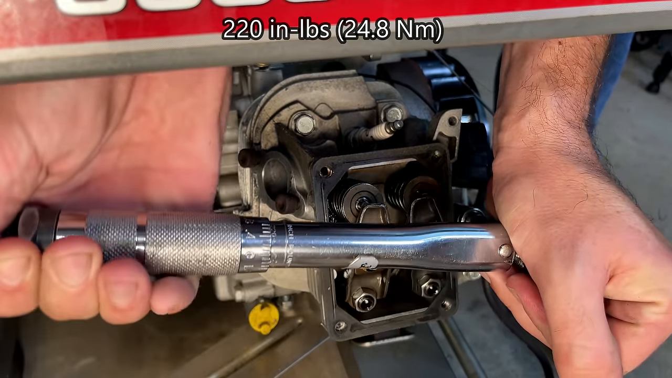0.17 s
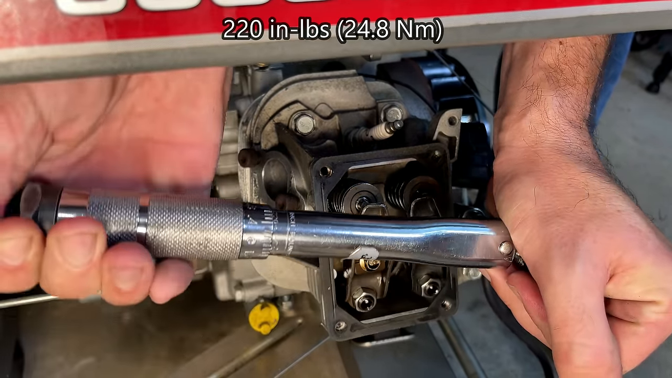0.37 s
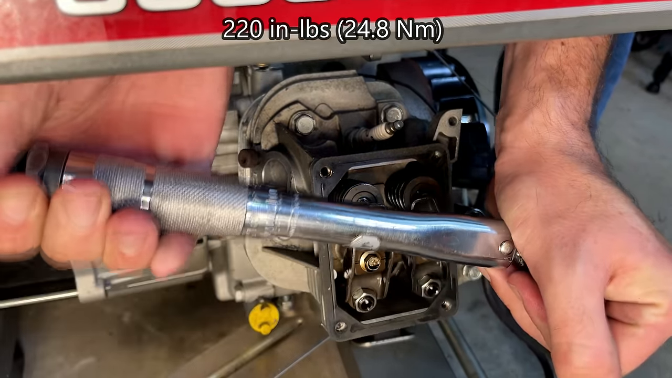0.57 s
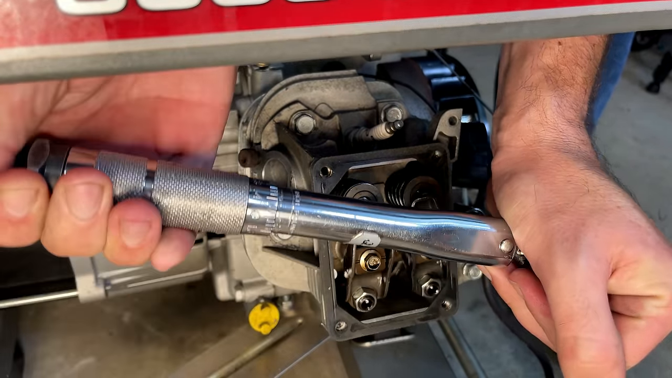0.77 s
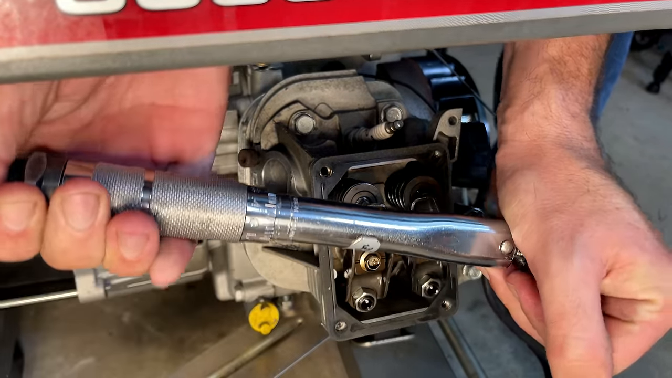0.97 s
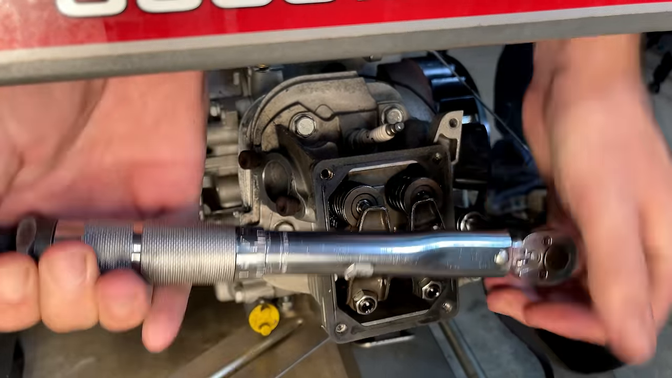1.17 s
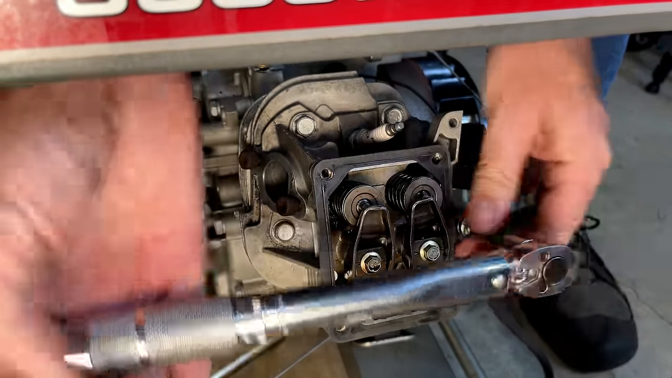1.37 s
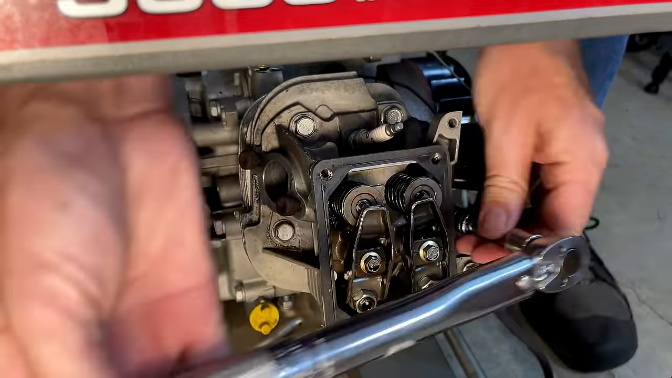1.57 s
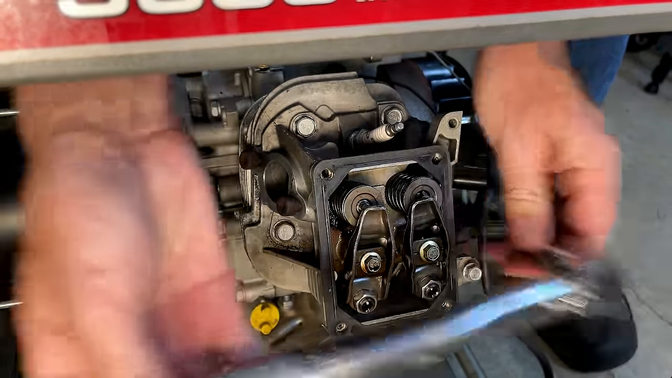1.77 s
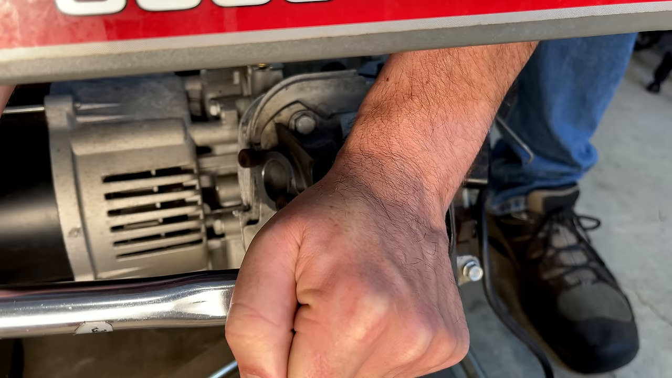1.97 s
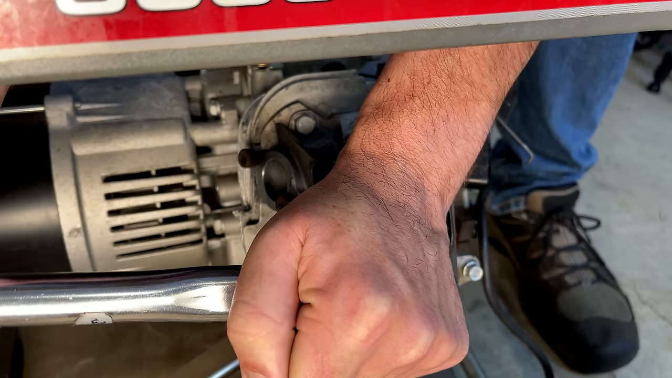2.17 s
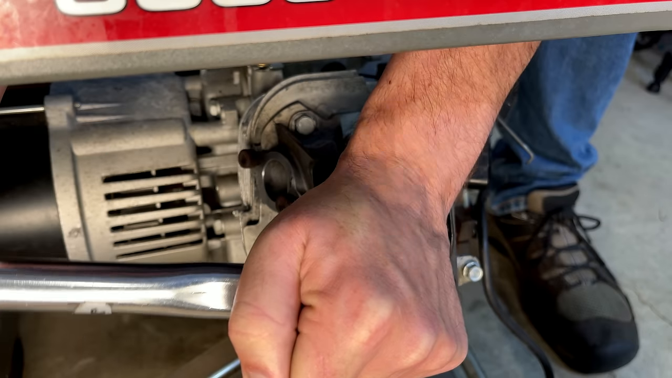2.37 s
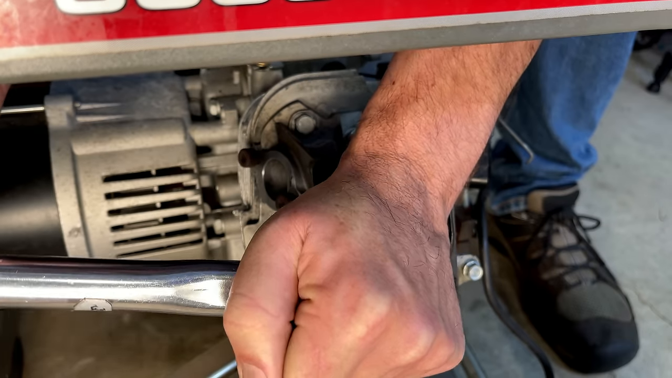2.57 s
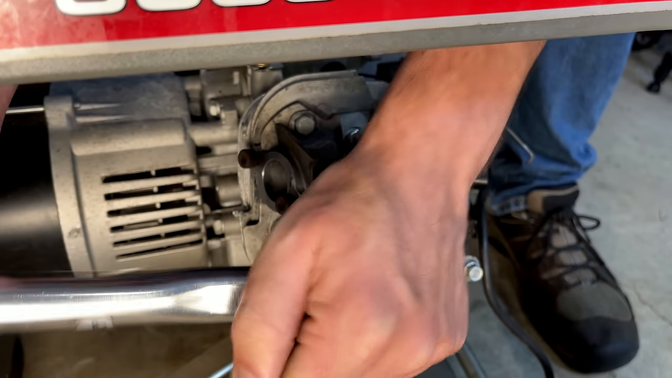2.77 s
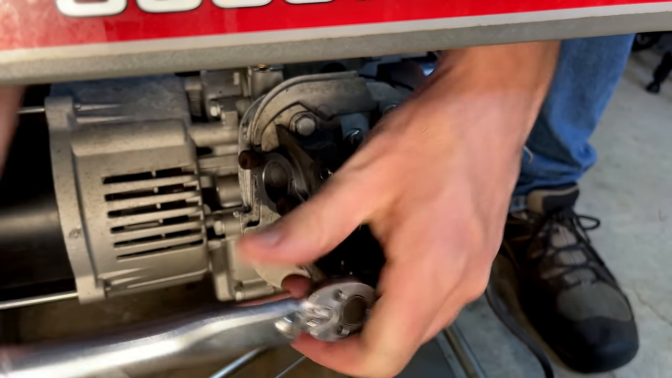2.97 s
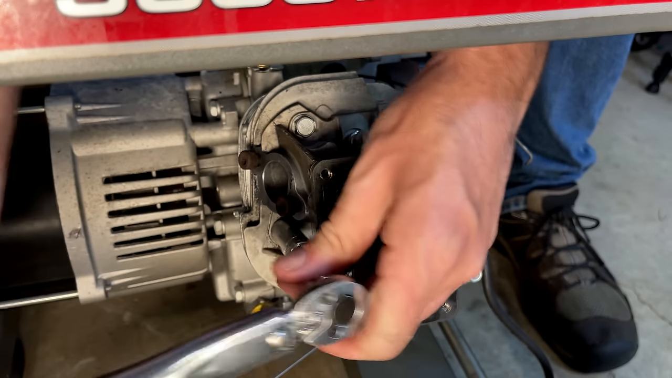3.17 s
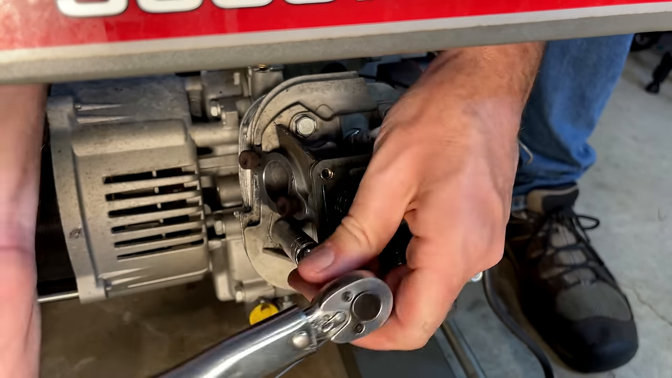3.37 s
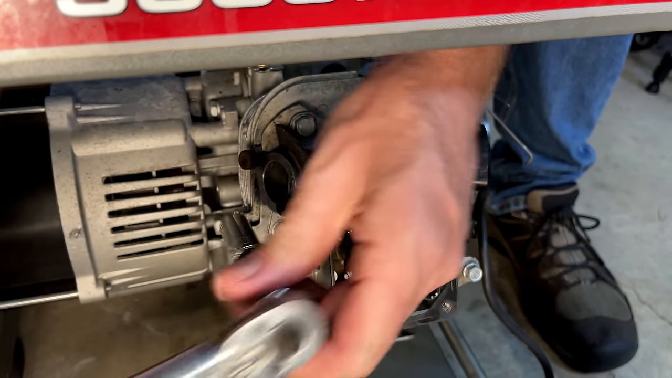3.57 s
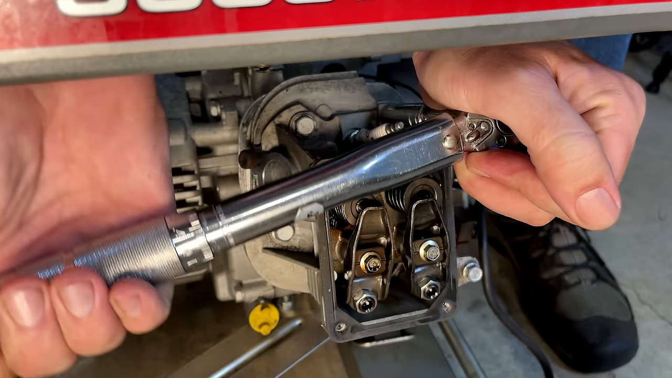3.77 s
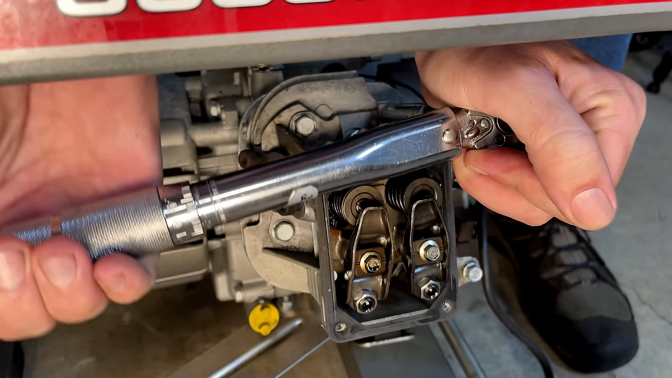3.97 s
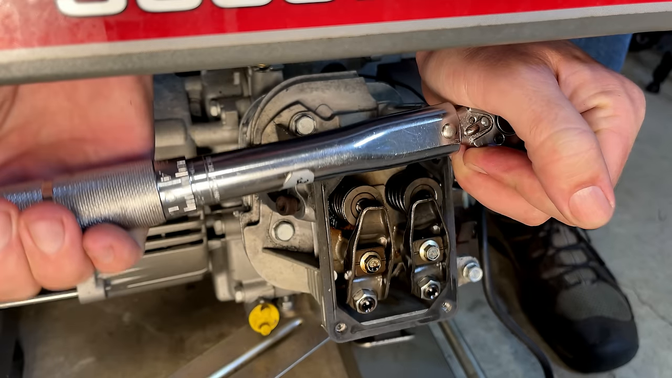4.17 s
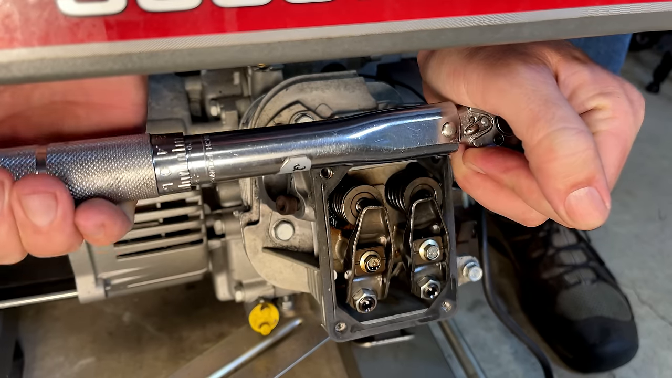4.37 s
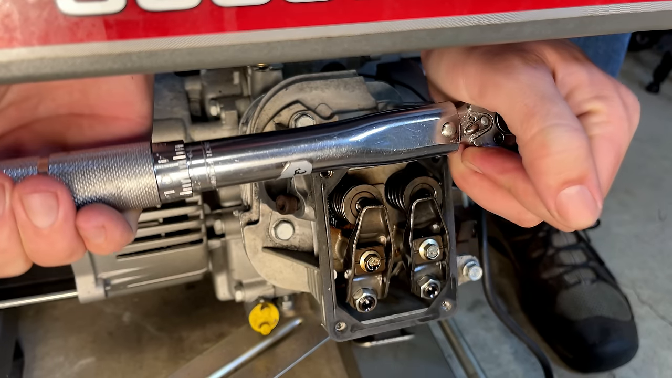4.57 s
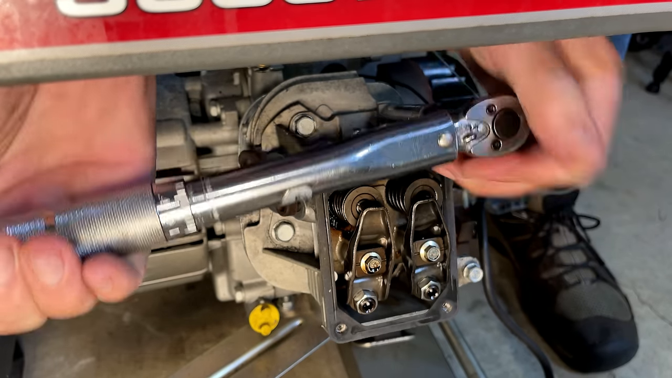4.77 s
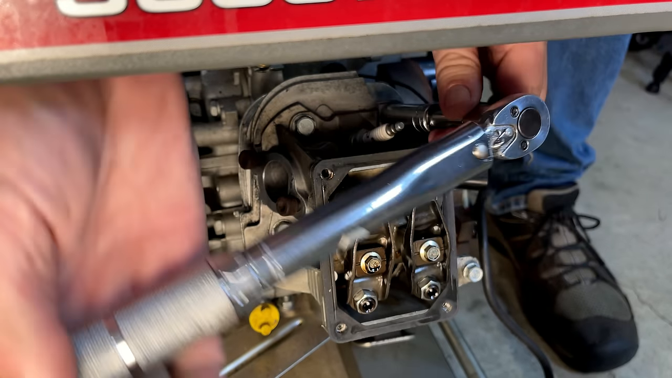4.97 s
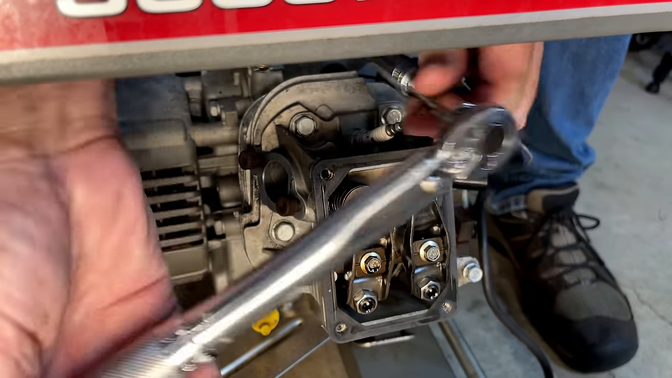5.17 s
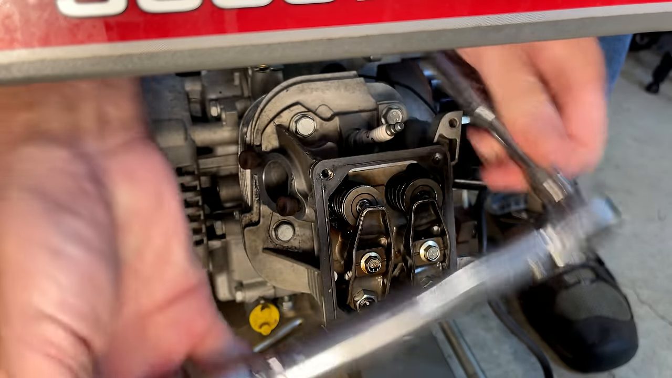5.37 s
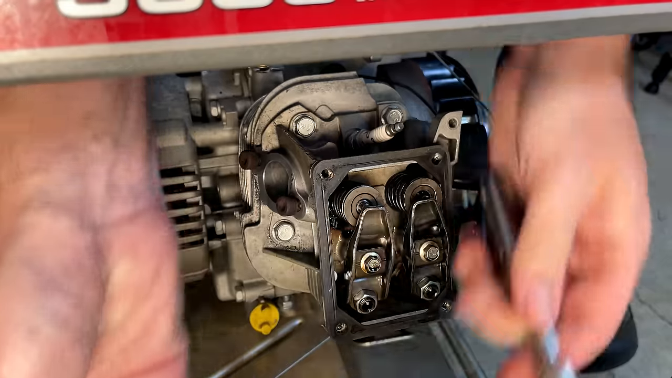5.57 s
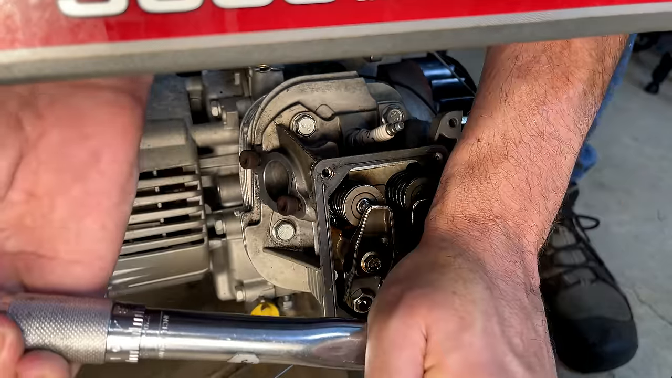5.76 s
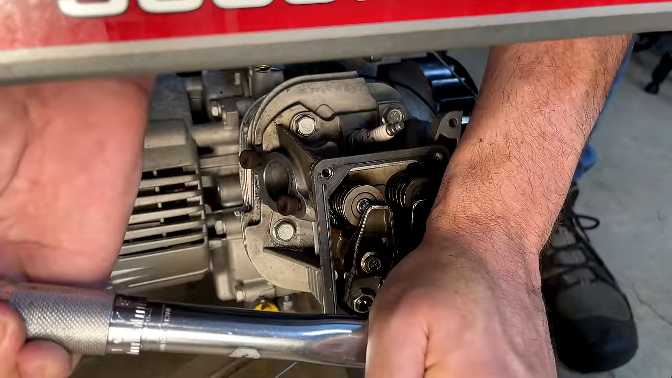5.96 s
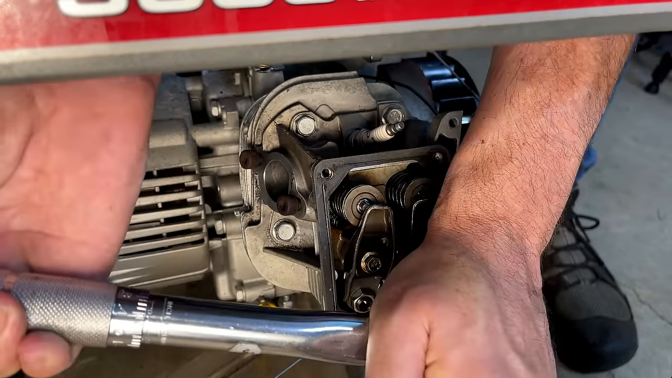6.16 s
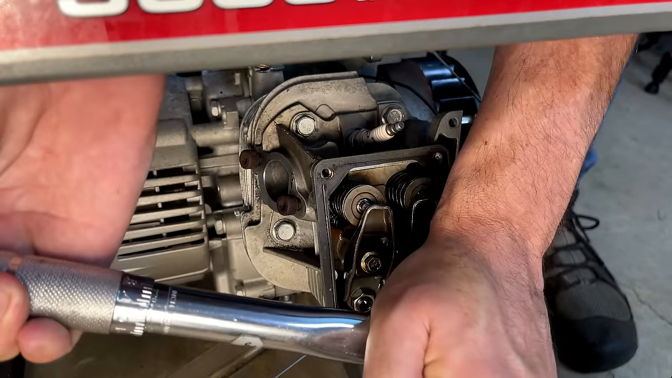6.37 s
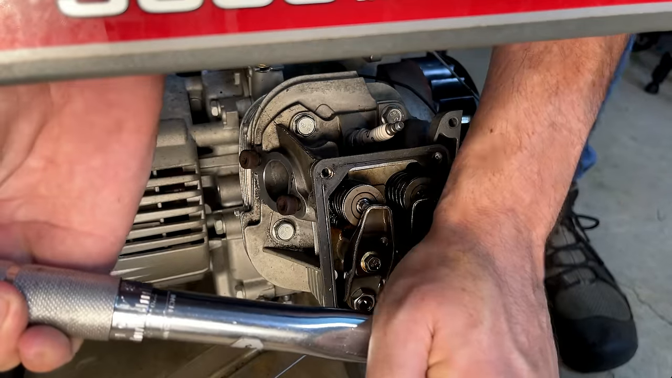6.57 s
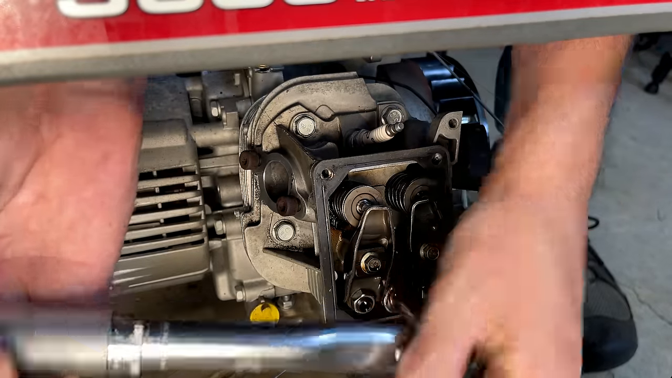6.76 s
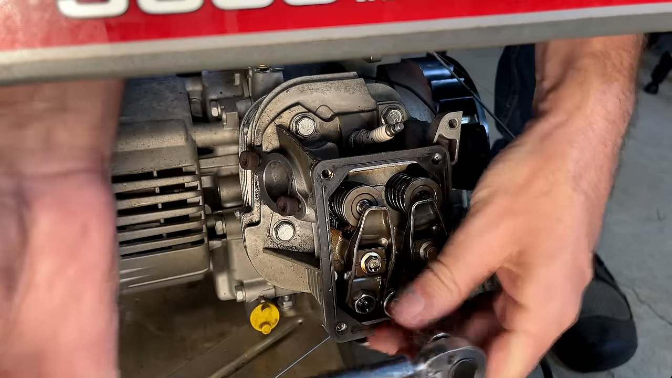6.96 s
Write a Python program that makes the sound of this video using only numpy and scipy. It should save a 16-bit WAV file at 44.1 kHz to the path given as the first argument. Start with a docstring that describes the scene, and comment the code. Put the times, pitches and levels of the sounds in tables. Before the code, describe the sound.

Four pairs of sharp, ringing steel clicks from a torque wrench, with soft ticks and socket clinks between them over a low workshop hum.

```python
"""A low motor hum and dull room air fill a hard-walled workshop. Close to a mono microphone, a click-type
torque wrench breaks over on a small engine's rocker bolt: a sharp steel snap that rings the engine and
the room. Half a second later it snaps back as the hand eases off. The ratchet pawl ticks and the socket
knocks off the nut. Three more bolts follow, about two seconds apart, each with its snap and return;
ticks and knocks lead to the third, ticks alone to the fourth."""
import sys
import numpy as np
from scipy import signal
from scipy.fft import rfft, irfft
from scipy.io import wavfile
from scipy.ndimage import uniform_filter1d

SR = 44100
rng = np.random.default_rng(int(sys.argv[2]) if len(sys.argv) > 2 else 0)


def persist_wave(psi):
    """Save psi, clipped to +-1, as 16-bit WAV."""
    counts = np.round(np.clip(psi, -1, 1) * 32767).astype(np.int16)
    wavfile.write(sys.argv[1], SR, np.atleast_2d(counts).T)


N = 310023
T = np.arange(SR) / SR  # one second, the life of a click
HZ = np.arange(SR // 2 + 1)  # its frequency axis


def undb(db):
    """Decibels to gain."""
    return 10 ** (np.asarray(db) / 20)


def unit(x):
    """Scale to rms 1."""
    return x / np.sqrt(np.mean(x ** 2))


def along(points, hz):
    """Read a curve of (f/Hz, value) points on a log-frequency axis."""
    f, value = np.transpose(points)
    return np.interp(np.log(hz + 1), np.log(f), value)


def wander(rate_hz):
    """Slow random modulation, rms 1."""
    hold = int(SR / rate_hz)
    steps = np.repeat(rng.standard_normal(N // hold + 1), hold)
    return unit(uniform_filter1d(uniform_filter1d(steps, hold), hold)[:N])


def room_air(level_db=-64):
    """The bed: a dull, steady rush of air."""
    # spectrum of the air: f/Hz, relative level/dB
    colour = [(15, -57.5), (25, -31.5), (41, -12), (64, -22.5), (82, -12), (108, -3.5), (141, -9.5),
              (200, -5), (229, -13), (363, -13), (451, -15), (659, -17), (1330, -23.5), (2000, -32.5),
              (16000, -46)]
    hz = np.arange(N // 2 + 1) * SR / N
    rush = irfft(rfft(rng.standard_normal(N)) * undb(along(colour, hz)), N)
    return undb(level_db) * unit(rush)


def motor_hum(waver_db=1.25, drift_rad=.55):
    """A distant motor hums; its upper partials waver more than the lowest."""
    # motor partials: f/Hz, rms level/dB
    partials = [(59.2, -65), (118.4, -69.5), (194.5, -77), (367, -77), (640.6, -83.5), (6589, -99.5)]
    t = np.arange(N) / SR
    hum = np.zeros(N)
    for k, (hz, db) in enumerate(partials):
        gain = np.sqrt(2) * undb(db + waver_db * min(k, 2) * wander(3))
        drift = drift_rad * (k + 0.13) * wander(7.1)
        hum += gain * np.sin(2 * np.pi * hz * t + drift)
    return hum


def chatter(length_s, rise=0.21, settle_s=0.0022):
    """Steel faces slip and rebound for a few ms, ever harder, then settle: a burst of unit energy."""
    attack = np.minimum((T + 1 / SR) / length_s, 1) ** rise
    envelope = attack * np.exp(-np.maximum(T - .8 * length_s, 0) / settle_s)
    burst = rng.standard_normal(SR) * envelope
    for _ in range(4):  # flatten the spectrum while keeping the burst short
        burst = irfft(np.exp(1j * np.angle(rfft(burst)))) * envelope ** .25
    return burst / np.linalg.norm(burst)


def body(x, db):
    """Colour x through a resonant body: a minimum-phase filter whose gain is db over HZ."""
    cepstrum = irfft(np.log(undb(db)))
    cepstrum[1:SR // 2] *= 2
    cepstrum[SR // 2 + 1:] = 0
    return irfft(rfft(x) * np.exp(rfft(cepstrum)))


def driven(modes, spot_hz, lift_db, width_hz=220):
    """Each bolt or nut is struck at its own spot and drives the modes near one pitch hardest."""
    return [(hz, db + lift_db * np.exp(-((hz - spot_hz) / width_hz) ** 4), t60) for hz, db, t60 in modes]


def strike(blow, colour, modes, modes_db):
    """A burst of chatter through a steel part: a short coloured crack, then its modes ring on."""
    tones = sum(undb(db) / np.sqrt(t60 * SR) * np.sin(2 * np.pi * hz * T) * 1000 ** (-T / t60)
                for hz, db, t60 in modes)
    crack = body(blow, along(colour, HZ))
    return crack + undb(modes_db) * signal.fftconvolve(blow, tones)[:SR]


def seating(tilt_db, grip_hz, grip_db, ripple_db=1.5, ripple_step_hz=261):
    """EQ of a held part: contact hardness tilts it; the grip frees one resonance, damps the rest."""
    tilt = tilt_db * np.log2(np.maximum(HZ, 500) / 5000)
    half_width_hz = 0.025 * grip_hz + 30
    freed = grip_db / (1 + ((HZ - grip_hz) / half_width_hz) ** 2)
    ripple = rng.standard_normal(128)  # the fingers damp unevenly, differently on every blow
    return tilt + freed + ripple_db * np.interp(HZ / ripple_step_hz, np.arange(len(ripple)), ripple)


def workshop(x, wet_db, build_s=0.0017, thicken_s=0.055, sparse=0.27):
    """Direct sound, three near echoes and a tail that thickens with time and loses its treble first."""
    # reverb bands: f/Hz, t60/s, relative level/dB
    bands = [(200, 1, 0), (700, 0.73, 2.5), (1990, 0.62, 1), (3830, 0.65, 1.25), (6800, 0.61, -3),
             (9380, 0.54, -2.5), (12900, 0.46, -1.5), (16200, 0.31, 0.5)]
    # slaps off bench, floor and wall: delay/s, level/dB
    echoes = [(.0058, -7.5), (0.0172, -38.5), (0.0374, -18.5)]
    density = np.clip(sparse * (.1 + (T / thicken_s) ** 2), .001, 1)
    wash = rfft(rng.standard_normal(SR) * (rng.random(SR) < density) / np.sqrt(density))
    centres = np.array(bands)[:, 0]
    tail = sum(undb(db) * irfft(wash * np.interp(HZ, centres, share)) * 1000 ** (-T / t60)
               for share, (_, t60, db) in zip(np.eye(len(bands)), bands))
    tail *= 1 - np.exp(-T / build_s)
    response = tail * undb(wet_db) / np.linalg.norm(tail)
    response[0] += 1  # direct sound
    for delay, db in echoes:
        response[int(delay * SR)] += undb(db)
    return signal.fftconvolve(x, response)[:SR]


def frame_shudder(band_hz=(105, 200), swell_s=0.2):
    """The engine's frame shudders as the load jumps; the lows come late and linger."""
    bandpass = signal.butter(2, band_hz, "band", fs=SR, output="sos")
    rumble = signal.sosfilt(bandpass, rng.standard_normal(SR))
    return unit(rumble) * T / swell_s * np.exp(1 - T / swell_s)


def place(out, s, x):
    """Mix x in at time s; its tail stops dead if it reaches a cut."""
    # cuts ahead of the second and third bolts: t/s
    cuts = [2.04, 3.74]
    start = int(s * SR)
    stop = min([N, start + len(x)] + [int(cut * SR) for cut in cuts if cut > s])
    out[start:stop] += x[:stop - start]


def wrench(snaps, colour, gain_db, ring_db, bolt_db, shudder_db, wet_db):
    """Each snap cracks in the wrench's steel and runs down the socket into the engine, which rings."""
    # ringing metal of the engine, and the room's own low resonances at 470, 735 and 927 Hz: f/Hz, relative
    # level/dB, t60/s
    engine_modes = [(470, -10, .12), (735, -10, .08), (927, -16, .25), (1279, -19, .25), (1740, -10, .15),
                    (2794, -8, .25), (2982, -7, .25), (3127, -5, .2), (3240, -9, .18), (3348, -8, .2),
                    (3752, -1, .2), (3805, -7, .15), (4085, -6, .45), (4269, -1.5, .27), (4375, -5, .2),
                    (4985, -7, .35), (5186, -9, .42), (5303, -10, .42), (6315, -9, .35), (6521, -9, .4),
                    (8100, -13, .4), (8680, -7, .3), (8830, -8, .3), (9570, -5, .22), (10110, -5, .25),
                    (11300, -11, .25), (11930, -11, .25), (12940, -12, .25), (13697, -13, .25)]
    out = np.zeros(N)
    for s, db, length_s, tilt_db, bolt_hz, grip_hz, grip_db in snaps:
        modes = driven(engine_modes, bolt_hz, bolt_db)
        hit = strike(chatter(length_s), colour, modes, ring_db)
        snap = body(hit, seating(tilt_db, grip_hz, grip_db))
        place(out, s, undb(gain_db + db) * workshop(snap, wet_db) + undb(shudder_db) * frame_shudder())
    return out


def break_over():
    """At full torque the sprung block tips over and the head's tang slaps the tube."""
    # one snap per bolt: t/s, relative level/dB, chatter/s, tilt/(dB per octave),
    # bolt's pitch f/Hz, resonance freed by the grip f/Hz, its lift/dB
    snaps = [(.6535, 0, 0.0067, -0.3, 8100, 6390, 12), (2.4490, 1, 0.0087, 0, 5210, 4290, 5),
             (4.3470, 1.5, 0.006, 0.5, 5130, 6470, 7.5), (6.2935, 0, 0.0071, 0, 3310, 1970, 5.5)]
    # tone of the steel tube and head at break-over: f/Hz, level/dB
    colour = [(150, -7), (450, -24), (750, -6), (1050, -14), (1900, -4.5), (2450, -5), (3150, 2.5),
              (4700, 0), (5800, 1), (7500, 3.5), (9700, 4), (11000, 0), (14000, -6), (15800, -13.5)]
    return wrench(snaps, colour, gain_db=-2, ring_db=-9, bolt_db=11, shudder_db=-67.5, wet_db=1.5)


def snap_back():
    """The hand eases off and the sprung head snaps home."""
    # one return per bolt: t/s, relative level/dB, chatter/s, tilt/(dB per octave),
    # bolt's pitch f/Hz, resonance freed by the grip f/Hz, its lift/dB
    snaps = [(1.1620, -.3, 0.0041, 0, 8300, 8800, 4.9), (2.8633, 0, 0.0054, -0.47, 3830, 3106, 5.8),
             (4.7730, 0.17, 0.0059, -0.2, 5000, 4190, 2.4), (6.6937, -0.23, 0.0051, -0.27, 5560, 2650, 7.6)]
    # tone of the steel tube and head on return: f/Hz, level/dB
    colour = [(150, -35), (500, -9), (1300, -9.5), (1750, 1), (2300, -4), (2900, 1), (4200, 5), (5200, 2),
              (7500, 1.5), (8600, 4.5), (9900, 5), (10750, -3.5), (12600, 1), (15800, -24)]
    return wrench(snaps, colour, gain_db=-1.86, ring_db=-5, bolt_db=6, shudder_db=-69, wet_db=2)


def ratchet(gain_db=-3):
    """The pawl drops over single teeth as the wrench is carried across."""
    # pawl drops: t/s, relative level/dB
    ticks = [(1.53, -26), (1.832, -40), (3.367, -34.5), (3.506, -37), (5.214, -35.5), (5.279, -35),
             (5.665, -36.5), (5.701, -36.5), (5.758, -43)]
    # tone of the pawl: f/Hz, level/dB
    colour = [(500, -25), (2000, 0), (4000, -4.5), (7200, -0.5), (9800, -6.5), (12000, -9), (16000, -27)]
    out = np.zeros(N)
    for s, db in ticks:
        tick = body(chatter(length_s=0.004, rise=0.17, settle_s=.003), along(colour, HZ))
        place(out, s, undb(gain_db + db) * workshop(tick, wet_db=2))
    return out


def socket(gain_db=-3):
    """The loose socket rattles on a nut and clinks; the hand shields it, so the room carries most."""
    # socket meeting or leaving a nut: t/s, relative level/dB, tilt/(dB per octave),
    # nut's pitch f/Hz, resonance freed by the grip f/Hz, its lift/dB
    knocks = [(1.8886, -23, -0.1, 2100, 2020, 2), (3.4032, -25, -3.5, 1520, 11000, 19),
              (3.431, -27, 3.5, 5400, 4100, 13), (3.575, -29, -1, 5600, 5140, 16),
              (3.5949, -17, 2, 7540, 3810, 16)]
    # tone of the socket's crack: f/Hz, level/dB
    colour = [(200, -8), (700, -7.5), (1400, 1), (2150, 1.5), (2640, 7.5), (3200, -3.5), (4500, -4.5),
              (5600, -0.5), (6800, -7), (9500, -8), (12000, -12), (15500, -31)]
    # ringing steel of the socket: f/Hz, relative level/dB, t60/s
    socket_modes = [(1586, -7, 0.08), (2020, -5, 0.14), (2130, 1.5, .2), (2660, -14.5, 0.096),
                    (3180, -1, 0.068), (3590, -20, .12), (3940, -11, 0.13), (5460, -3, .18),
                    (5340, -15, .15), (7570, -12, 0.17)]
    out = np.zeros(N)
    for s, db, tilt_db, nut_hz, grip_hz, grip_db in knocks:
        rattle = chatter(length_s=0.0098, rise=0.38, settle_s=0.0038)
        modes = driven(socket_modes, nut_hz, lift_db=10.5)
        hit = strike(rattle, colour, modes, modes_db=-7)
        clink = body(hit, seating(tilt_db, grip_hz, grip_db))
        place(out, s, undb(gain_db + db) * workshop(clink, wet_db=3))
    return out


def scene():
    """Tool sounds over the workshop's bed, the same in both channels."""
    tool = break_over() + snap_back() + socket() + ratchet()
    bed = room_air() + motor_hum()
    return np.tile(tool + bed, (2, 1))


def record(dry):
    """The recorder drops the deepest bass and cuts the top."""
    low_cut = signal.butter(4, 44, "high", fs=SR, output="sos")
    high_cut = signal.ellip(10, .2, 80, 16000, fs=SR, output="sos")
    return signal.sosfilt(high_cut, signal.sosfilt(low_cut, dry))


dry = scene()
out = record(dry)
persist_wave(out)
```